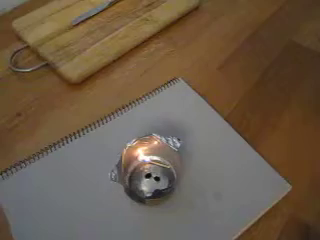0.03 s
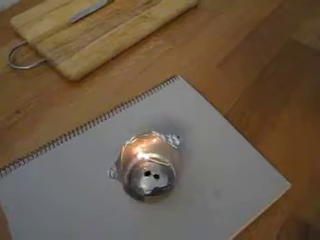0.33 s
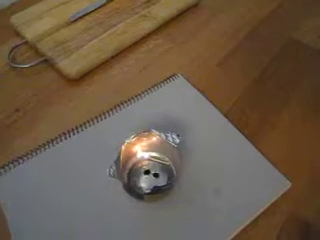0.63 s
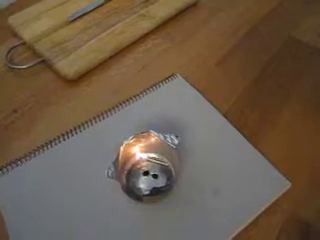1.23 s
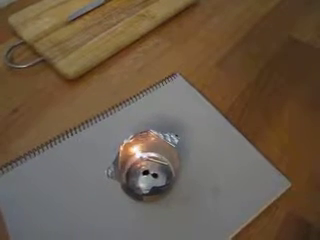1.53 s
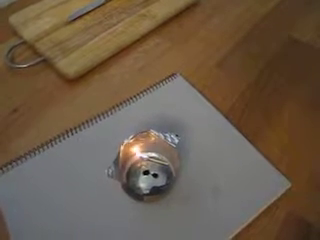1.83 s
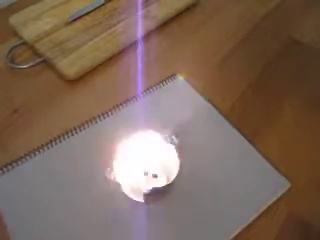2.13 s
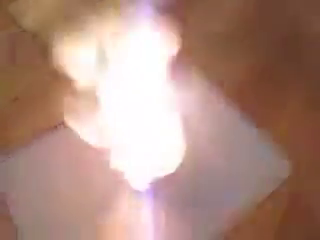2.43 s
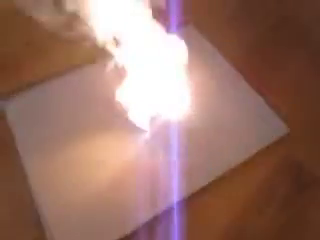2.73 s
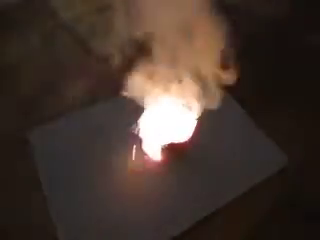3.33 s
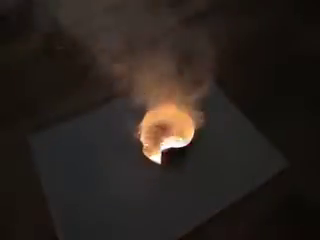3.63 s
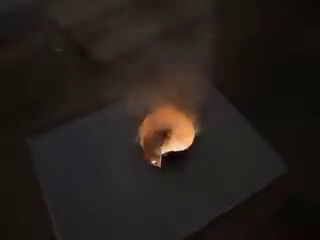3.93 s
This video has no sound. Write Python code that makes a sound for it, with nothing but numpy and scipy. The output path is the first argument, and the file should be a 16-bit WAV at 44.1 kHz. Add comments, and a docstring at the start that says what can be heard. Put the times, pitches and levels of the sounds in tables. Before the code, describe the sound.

Metal powder flares up with a roaring hiss and a few sharp cracks indoors.

```python
"""Indoors, at a table, one microphone close to a small steel pot in which a charge of metal powder flares up.
The powder sputters as it catches, then turbulent gas roars and hisses and bursting metal spits sharp cracks.
The hollow of the pot gives the flame drifting resonances, and the table top throws back a quick echo.
Under it all lie a low room hum and the recorder's thin whine."""
import sys
import numpy as np
from scipy import signal
from scipy.fft import rfft, irfft
from scipy.io import wavfile
from scipy.ndimage import uniform_filter1d

SR = 44100
rng = np.random.default_rng(int(sys.argv[2]) if len(sys.argv) > 2 else 0)


def master_out(mix):
    """Clip the mix to full scale and print it as 16-bit PCM to the path in sys.argv[1]."""
    frames = np.transpose(np.atleast_2d(mix))
    ceiling = np.clip(frames, -1, 1)
    pcm = np.round(ceiling * 32767).astype(np.int16)
    wavfile.write(sys.argv[1], SR, pcm)


N = 176400
TIME, HZ = np.arange(N) / SR, np.fft.rfftfreq(N, 1 / SR)


def amp(db):
    """Decibels to gain."""
    return 10 ** (np.asarray(db) / 20)


def unit(x):
    """Scales to rms 1."""
    return x / np.sqrt(np.mean(x ** 2) + 1e-20)


def along(table, t, column=1):
    """One column of a curve at times t."""
    rows = np.array(table)
    return np.interp(t, rows[:, 0], rows[:, column])


def shape_db(points, hz):
    """A spectrum interpolated on a log-frequency axis."""
    f, db = np.transpose(points)
    return np.interp(np.log(hz + 1), np.log(f), db)


def coloured(gain):
    """Steady noise of rms 1, shaped by a gain for each frequency."""
    return unit(irfft(rfft(rng.standard_normal(N)) * gain, N))


def wander(rate_hz):
    """Random drift that rolls off above a rate."""
    return coloured(HZ / (HZ + rate_hz / 10) / (1 + (HZ / rate_hz) ** 2))


def peak(hz, centre, half_width):
    """The bell of a resonance."""
    return 1 / (1 + ((hz - centre) / half_width) ** 2)


def swell(t, centre, half_length):
    """A smooth rise and fall in time."""
    return np.exp(-((t - centre) / half_length) ** 2)


# Noise floor at the microphone (frequency [Hz], relative level [dB])
FLOOR_SPECTRUM = [(20, -1), (32, 1.5), (45, -2.5), (100, -2.5), (170, -7.5), (300, -11), (600, -14),
                  (850, -14), (1500, -16.5), (3000, -22), (7000, -25.5), (10500, -25.5), (12500, -33),
                  (15800, -41)]
# Faint narrow bands of the room and the recorder (centre [Hz], half width [Hz], level [dB])
FAINT_BANDS = [(159.3, 5, -71.5), (240.6, 6.6, -72), (788, 3.6, -74.5), (7830, 49, -71.5), (8670, 560, -71)]
def room_tone(floor_db=-55.5):
    """The steady noise of the room and the recorder, strongest in the bass."""
    floor = amp(floor_db) * coloured(amp(shape_db(FLOOR_SPECTRUM, HZ)))
    return floor + sum(amp(db) * coloured(peak(HZ, centre, width)) for centre, width, db in FAINT_BANDS)


def recorder_whine(pitch_hz=8460, jitter_hz=130, level_db=-64.5):
    """The recorder's own thin tone, steady in level and unsteady in pitch."""
    pitch = pitch_hz + jitter_hz * wander(rate_hz=320)
    return amp(level_db) * unit(np.sin(2 * np.pi * np.cumsum(pitch) / SR))


# Low hum in the room, swelling and fading (time [s], level [dB])
HUM_LEVELS = [(0.07, -55.5), (0.15, -44.5), (0.33, -57), (0.42, -50.5), (0.49, -60), (0.57, -50),
              (0.9, -57), (1.25, -61.5), (2.1, -57), (2.7, -53.5), (3.2, -92), (3.7, -72), (3.84, -47.5),
              (4.0, -54)]
def room_hum(pitch_hz=62.8, drift_hz=2.4, waver_db=2.6):
    """A low tone that wavers in pitch and level."""
    pitch = pitch_hz + drift_hz * wander(rate_hz=8.6)
    tone = np.sin(2 * np.pi * np.cumsum(pitch) / SR) * amp(waver_db * wander(rate_hz=5.6))
    return unit(tone) * amp(along(HUM_LEVELS, TIME))


def wall_reverb(x, level_db=-15, t60_s=0.083, rise_s=0.0027):
    """The walls add a short tail, weak this close to the pot."""
    t = np.arange(SR // 2) / SR
    tail = rng.standard_normal(len(t)) * np.exp(-np.log(1000) * t / t60_s) * np.minimum(t / rise_s, 1)
    return x + amp(level_db) * signal.fftconvolve(x, tail / np.linalg.norm(tail))[:N]


def table_echo(x, delay_s=0.002441, strength=0.43, top_hz=2230):
    """A dull reflection off the table top reaches the microphone late and combs the low end."""
    echo = strength / (1 + (HZ / top_hz) ** 4)
    comb = (1 + echo * np.exp(-2j * np.pi * HZ * delay_s)) / np.sqrt(1 + echo ** 2)
    return irfft(rfft(x) * comb, N)


# Resonances and dips of the pot and its surroundings (centre [Hz], half width [Hz], gain [dB])
POT_RESONANCES = [(245, 11, 10.5), (296, 20, -8), (1490, 34, -2.5), (1600, 23, 2), (1834, 23, -11.5),
                  (1913, 79, 4), (2040, 36, -3)]
def pot_body(x):
    """The pot's steady, hollow colour, which stays while the flame changes."""
    gain_db = sum(db * peak(HZ, centre, width) for centre, width, db in POT_RESONANCES)
    # Minimum phase, so the ringing follows the sound that excites it
    cepstrum = irfft(np.log(amp(gain_db)), N)
    cepstrum[1:N // 2] *= 2
    cepstrum[N // 2 + 1:] = 0
    ringing = irfft(np.exp(rfft(cepstrum)), N)[:4096]
    return signal.fftconvolve(x, ringing)[:N]


# Low puffs close to the microphone (time [s], half length [s], level [dB], roll-off [Hz])
GAS_PUFFS = [(2.467, 0.14, -48.5, 180), (2.61, 0.035, -50.5, 50)]
def gas_puffs():
    """Hot gas displaces the air in soft thumps."""
    return sum(amp(db) * swell(TIME, s, half_length) * coloured(HZ / (1 + (HZ / top_hz) ** 4))
               for s, half_length, db, top_hz in GAS_PUFFS)


# Faint sputters inside the pot (time [s], level [dB], decay [s])
IGNITION_SPUTTERS = [(1.57, -58, .012), (1.737, -54, 0.017), (1.766, -56.5, .008), (2.1735, -43, 0.0028)]
# Their colour (frequency [Hz], relative level [dB])
SPUTTER_SPECTRUM = [(20, -40), (1500, -2), (3000, -6), (3500, 1), (4100, -12), (5800, -5), (7000, -7),
                    (11500, -8), (15000, -24)]
def sputters():
    """The charge catches in small, sudden bursts of noise."""
    level = sum(amp(db) * (TIME > s) * np.exp(-abs(TIME - s) / decay)
                for s, db, decay in IGNITION_SPUTTERS)
    return level * coloured(amp(shape_db(SPUTTER_SPECTRUM, HZ)))


# Bursting metal at close range (time [s], peak level [dB], ring [Hz], decay [s])
METAL_CRACKS = [(2.6316, -4.5, 9000, 0.00016), (2.7925, -3, 9900, 0.00028), (2.8213, -21, 9000, 0.00017),
                (2.8918, -6, 10700, 0.00035), (2.9334, -5.5, 9330, .0004), (2.936, -14, 9200, 0.00025),
                (3.046, -19, 9500, 0.00033), (3.0464, -1.5, 10000, 0.0002), (3.0483, -8, 9850, 0.00022),
                (3.1539, -3, 9070, 0.00029), (3.158, -9, 9400, 0.00017), (3.229, -14, 9400, 0.00017)]
def metal_cracks(rise_s=0.000099, grit_gain=0.37, grit_above_hz=1520, top_hz=13300):
    """Each burst of metal is a bright, gritty snap of a few cycles."""
    out, t = np.zeros(N), np.arange(256) / SR
    for s, db, ring_hz, decay in METAL_CRACKS:
        noise = rng.standard_normal(len(t))
        grit = signal.lfilter(*signal.butter(1, grit_above_hz, "high", fs=SR), noise)
        envelope = np.minimum(t / rise_s, 1) * np.exp(-t / decay)
        snap = (np.sin(2 * np.pi * ring_hz * t) + grit_gain * grit) * envelope
        snap = signal.lfilter(*signal.butter(4, top_hz, fs=SR), snap)
        start = round(s * SR)
        out[start:start + len(snap)] += amp(db) * snap / abs(snap).max()
    return out


# Three resonances of the pot's hollow (time [s], centres 1-3 [Hz], prominences 1-3 [dB])
HOLLOW_DRIFT = [(2.2, 3480, 5860, 7780, 15.3, 9.8, 7.3), (2.35, 3560, 6020, 7900, 11.6, 11.3, 14),
                (2.45, 3850, 6000, 8200, 6.7, 1.9, 8.9), (2.55, 3790, 6300, 8360, 8.3, 1, 8.3),
                (2.66, 4000, 7240, 9300, 3, 4.9, 1.6), (2.87, 4300, 6500, 9000, 6.4, 6.9, 5),
                (3.0, 4370, 6900, 9700, 6.4, 6.9, 4), (3.13, 4740, 7350, 9750, 3.6, 9.8, 7),
                (3.42, 5000, 7180, 10750, 3.4, 1.4, 3), (3.62, 4840, 7280, 9700, 12.7, 11, 2.8),
                (3.76, 4700, 6750, 9500, 7, 9, 5), (3.86, 4620, 6750, 9200, 7.5, 17, 6.6),
                (4.0, 4870, 7160, 10000, 6.6, 9, 4.4)]
# Breadth of those resonances (half widths 1-3 [Hz])
HOLLOW_WIDTHS = [210, 430, 260]
def hollow_db(hz, t, notch_share=0.15, notch_below_hz=830):
    """The hollow's resonances drift as the charge burns; the sound partly cancels just below each."""
    total = 0
    for k, width in enumerate(HOLLOW_WIDTHS):
        centre, prominence = along(HOLLOW_DRIFT, t, column=k + 1), along(HOLLOW_DRIFT, t, column=k + 4)
        notch = notch_share * peak(hz, centre - notch_below_hz, width)
        total = total + prominence * (peak(hz, centre, width) - notch)
    return total


# Whistles and dips in the jet (time [s], half length [s], centre [Hz], half width [Hz], gain [dB])
JET_WHISTLES = [(2.37, 0.16, 7200, 200, -8), (2.617, .07, 3790, 71, 8.5), (2.815, 0.04, 2570, 160, 11),
                (3, 0.34, 1060, 300, -1.5), (2.65, 0.13, 5200, 500, 5), (2.9, .1, 4700, 130, -8),
                (2.96, 0.17, 7600, 340, -6), (5.2, .07, 4150, 200, -6), (3.82, 0.12, 3730, 150, -7),
                (3.9, 0.18, 5800, 300, -3.5), (3.82, 0.1, 4120, 62, 18), (3.86, .15, 4950, 100, 7),
                (3.83, .1, 7500, 170, 6), (3.81, 0.13, 1670, 130, 8), (4.7, 0.091, 10700, 460, -8),
                (3.86, .12, 12600, 440, 5)]
def whistles_db(hz, t):
    """Narrow bands of the jet briefly stand out or sink."""
    return sum(db * swell(t, s, half_length) * peak(hz, centre, width)
               for s, half_length, centre, width, db in JET_WHISTLES)


def burning_powder(grains_per_s=1500, spread_db=3.0, sizzle_db=-9, flutter_db=1.13):
    """Turbulent gas flutters while burning grains sizzle in tiny bursts."""
    sizes = amp(spread_db * np.minimum(rng.exponential(1, N), 5))
    grains = unit(sizes * rng.choice([-1, 1], N) * (rng.random(N) < grains_per_s / SR))
    gas = rng.standard_normal(N) * amp(flutter_db * wander(rate_hz=60))
    return unit(gas + amp(sizzle_db) * grains)


# The flame, close up (time [s], roar level [dB], rush level [dB], hiss level [dB])
FLAME_LEVELS = [(2.12, -62, -54, -58), (2.171, -72, -55, -57), (2.176, -55, -42.5, -44),
                (2.194, -54, -41.5, -41), (2.203, -43.5, -26, -27.5), (2.225, -42.5, -25.5, -28),
                (2.26, -51.5, -36.5, -33), (2.34, -42.5, -28.5, -30.5), (2.42, -42, -28.5, -29.5),
                (2.47, -44, -33, -32), (2.53, -38.5, -29, -27.5), (2.6, -43.5, -30, -23.5),
                (2.68, -43, -30.5, -21.5), (2.782, -45, -31, -25.5), (2.802, -47.5, -35, -33),
                (2.93, -47, -37, -36.5), (3.02, -49.5, -35, -31), (3.14, -47, -37.5, -29),
                (3.168, -59, -39.5, -37.5), (3.29, -55, -44.5, -37), (3.38, -55.5, -44, -32.5),
                (3.485, -58, -39, -37), (3.52, -60, -47, -41), (3.58, -60.5, -46, -46),
                (3.79, -57, -44.5, -44), (3.85, -48.5, -36, -37), (3.92, -52, -39.5, -36.5),
                (3.96, -57, -44, -43), (3.995, -57, -44, -36.5)]
# Its low roar, middle rush and high hiss (frequency [Hz], relative level [dB])
ROAR_SPECTRUM = [(20, -18), (60, -13), (130, -4.5), (250, -6), (420, 1.5), (800, -0.5), (1200, -6),
                 (2500, -42), (16000, -84)]
RUSH_SPECTRUM = [(20, -68), (500, -49), (900, -10), (1300, -2), (1700, 1), (2400, 3.5), (3200, -0.5),
                 (4300, -3), (5500, -6), (7000, -9), (10000, -19.5), (16000, -53)]
HISS_SPECTRUM = [(20, -67), (2000, -57), (4500, -21.5), (6500, -5), (8500, 1.5), (10400, 5.5),
                 (11800, -1.5), (13500, -9.5), (15800, -23.5)]
# Its small surges (time [s], half length [s], gain [dB])
FLAME_SURGES = [(2.221, .004, 2), (3.614, 0.013, 3.5), (3.743, 0.0082, 6.5), (3.848, 0.011, 2.5)]
def flame(patch_db=1.11, bright_from_db=-28):
    """The jet from the burning powder roars, rushes and hisses, coloured by the hollow of the pot."""
    frames = dict(fs=SR, nperseg=512, noverlap=384)
    hz, t, source = signal.stft(burning_powder(), **frames)
    hz = hz[:, None]
    # The colour flickers in random patches of frequency and time
    patches = uniform_filter1d(rng.standard_normal(source.shape), size=6, axis=0)
    patches = uniform_filter1d(patches, size=14, axis=1)
    # A fiercer jet has more top treble
    excess_hiss_db = np.maximum(along(FLAME_LEVELS, t, column=3) - bright_from_db, 0)
    treble_db = 0.4 * excess_hiss_db * np.clip((hz - 9500) / 3000, 0, 2)
    colour_db = hollow_db(hz, t) + whistles_db(hz, t) + patch_db * unit(patches) + treble_db
    jet = np.zeros(N)
    for column, spectrum in enumerate([ROAR_SPECTRUM, RUSH_SPECTRUM, HISS_SPECTRUM], start=1):
        gain = amp(shape_db(spectrum, hz) + colour_db)
        gain /= np.sqrt(np.mean(gain ** 2, axis=0))  # colour leaves the layer's level alone
        layer = signal.istft(source * gain, **frames)[1][:N]
        jet += layer * amp(along(FLAME_LEVELS, TIME, column))
    surge_db = sum(db * swell(TIME, s, half_length) for s, half_length, db in FLAME_SURGES)
    fade_in = np.interp(TIME, [FLAME_LEVELS[0][0], FLAME_LEVELS[1][0]], [0, 1])
    return jet * amp(surge_db) * fade_in


def scene():
    """One microphone close to the pot feeds both channels."""
    fire = pot_body(table_echo(flame() + sputters())) + metal_cracks()
    mono = wall_reverb(fire) + gas_puffs() + room_tone() + recorder_whine() + room_hum()
    return np.array([mono, mono])


def record(dry):
    """The recorder opens just after the start and limits the band."""
    opens_s, top_hz = 0.072, 15950
    lowpass = signal.firwin(511, top_hz, window=("kaiser", 9), fs=SR)
    return signal.oaconvolve(dry * (TIME > opens_s), lowpass[None], "same")


dry = scene()
out = record(dry)
master_out(out)
```